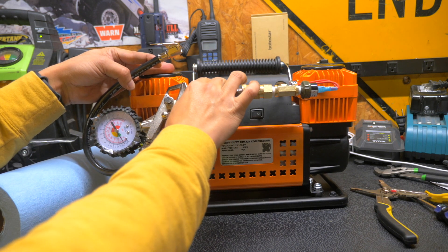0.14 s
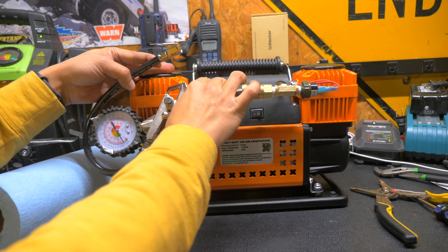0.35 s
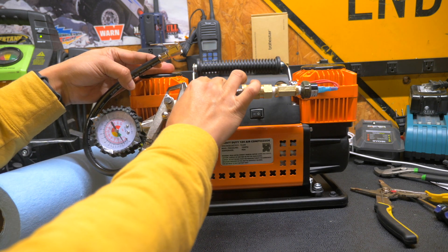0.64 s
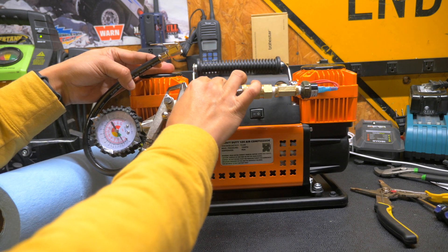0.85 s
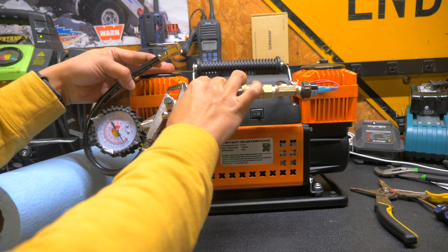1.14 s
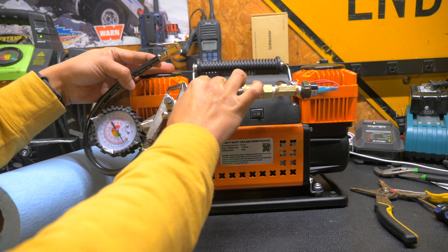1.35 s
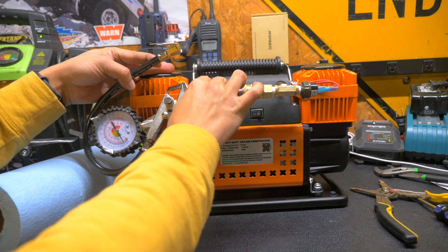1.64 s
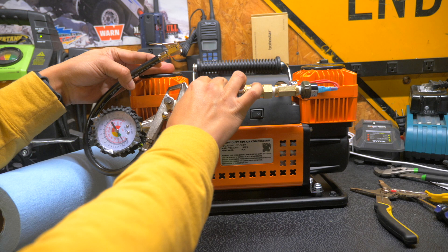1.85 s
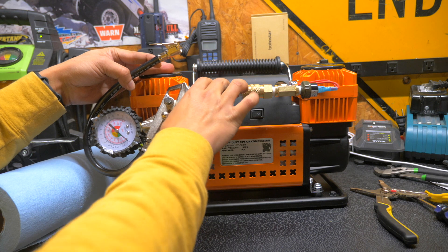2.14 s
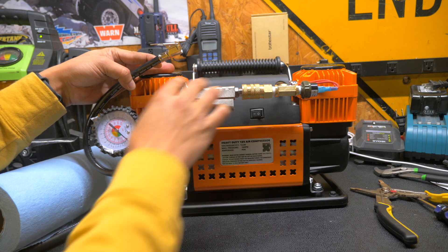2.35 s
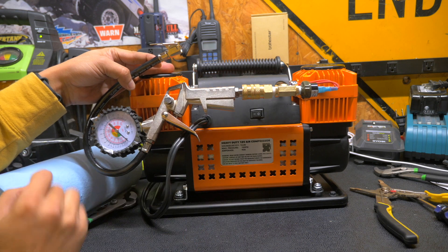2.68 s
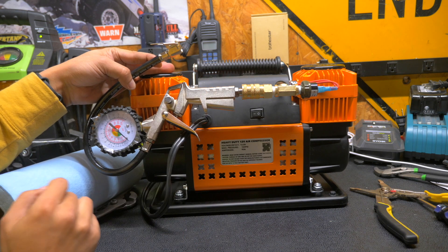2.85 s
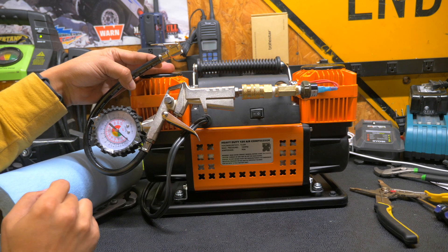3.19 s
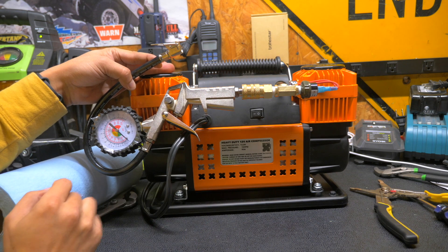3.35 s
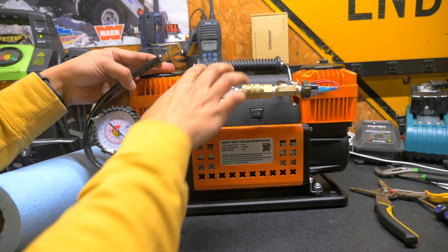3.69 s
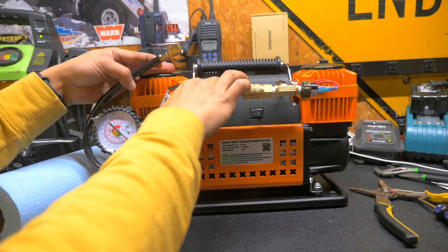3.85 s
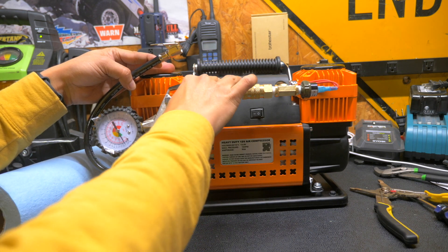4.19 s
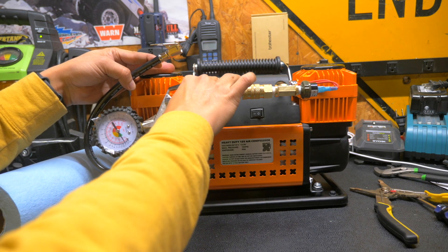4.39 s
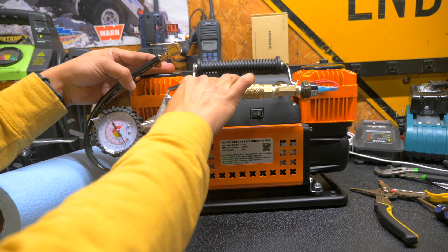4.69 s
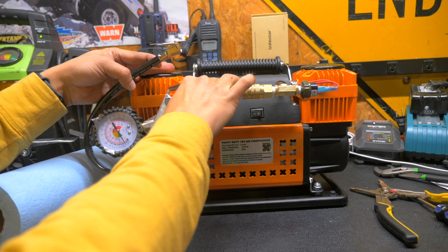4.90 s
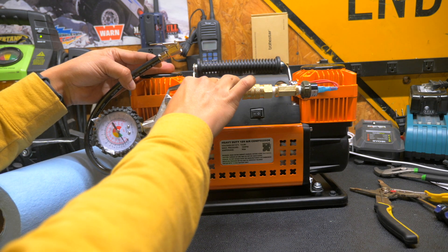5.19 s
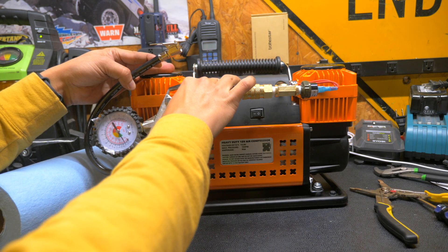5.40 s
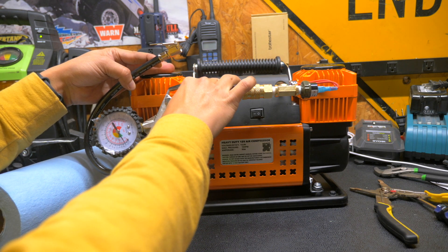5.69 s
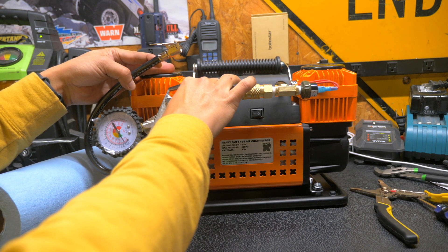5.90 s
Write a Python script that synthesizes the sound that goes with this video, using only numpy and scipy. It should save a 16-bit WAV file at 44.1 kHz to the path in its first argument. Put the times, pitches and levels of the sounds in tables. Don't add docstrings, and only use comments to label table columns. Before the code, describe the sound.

From the start, a small twin-cylinder compressor runs close by on a bench: a coarse, rapid rattling buzz of about 37 strokes a second, with fluttering valves, ringing metal casing, low bench vibration and bright motor whir. A sharp, steady air-gun hiss lies over it. At about 2.1 s the hiss shuts off; the pump sags slightly, then races and climbs in pitch. Around 2.65-2.8 s bright switch clicks cut the power, trapped air bleeds briefly, and the crank slows with a low rumble, stopping near 2.95 s in several dull rocking knocks until 3.1 s. Near silence follows: faint low workshop murmur, a weak fading metallic ring, and tiny handling ticks around 3.4, 3.6 and 3.8 s. At 4.07 s the air gun bursts open, strongest at first; at 4.15 s the motor kicks in, spinning up within a fraction of a second. Buzz and hiss continue together to the end at about 6 s, in a short, dry room.

```python
import sys
import numpy as np
from scipy import signal
from scipy.fft import rfft, irfft
from scipy.io import wavfile
from scipy.ndimage import uniform_filter1d

SR = 44100
rng = np.random.default_rng(int(sys.argv[2]) if len(sys.argv) > 2 else 0)


def unload_wav(signal):
    wavfile.write(
        sys.argv[1],
        SR,
        np.round(np.clip(np.atleast_2d(signal).T, -1, 1) * 32767).astype(np.int16),
    )


def how_loud(loudness_db):
    steps = np.asarray(loudness_db, float) / 20
    return 10 ** steps


N = 266187
T = np.arange(N) / SR

FIRST_ON_S, CUT_S, LAST_STROKE_S, REST_S, RESTART_S = -.28, 2.681, 2.9, 2.95, 4.146
RATED_TURNS_PER_S, SLOW_TURNS_PER_S = 36.8, 25
SPIN_UP_S = .09


def coloured(points):
    hz, db = np.transpose(points)
    bins = np.fft.rfftfreq(N, 1 / SR) + 1
    gain = how_loud(np.interp(np.log(bins), np.log(hz), db, left=-90, right=-90))
    x = irfft(rfft(rng.standard_normal(N)) * gain, N)
    return x / np.std(x)


def walk(rate):
    k = int(SR / rate)
    return uniform_filter1d(np.repeat(rng.standard_normal(N // k + 1), k), k)[:N]


def ring(x, hz, width_hz):
    return signal.lfilter(*signal.iirpeak(hz, hz / width_hz, fs=SR), x)


def add(out, at_s, shape):
    i = int(at_s * SR)
    if 0 <= i < N:
        out[i:i + len(shape)] += shape[:N - i]


def swell(peak_s, db, rise, hold_s, fall):
    return db - rise * np.maximum(peak_s - T, 0) - fall * np.maximum(T - peak_s - hold_s, 0)


def since_on():
    return T - np.where(T < RESTART_S - .002, FIRST_ON_S, RESTART_S)


def ramp(start_s, span_s):
    return np.clip((T - start_s) / span_s, 0, 1.2) * (T < REST_S + .5)


def pump(law, silent=None):
    gun_shut_s = 2.1
    state = [np.ones(N),
             np.minimum(ramp(gun_shut_s, .13), 1),
             np.minimum(ramp(gun_shut_s, .52), 1),
             ramp(CUT_S, .18),
             np.exp(-since_on() / .25),
             np.exp(-since_on() / SPIN_UP_S)]
    value = np.dot(law, state)
    if silent is not None:
        value = np.where((T > LAST_STROKE_S) & (T < RESTART_S - .002), silent, value)
    return uniform_filter1d(value, size=64)


def crank():
    # time in seconds, speed in turns per second.
    racing = [
        (2.09, 36.8),
        (2.21, 35.0),
        (2.35, 36.5),
        (2.5, 42.2),
        (2.646, 46.9),
        (2.69, 46.5),
    ]
    warm = .04 * np.sign(REST_S - T)
    driven = RATED_TURNS_PER_S + warm - 21 * np.exp(-since_on() / SPIN_UP_S)
    speed = np.where(T < racing[0][0], driven, np.interp(T, *np.transpose(racing)))
    coasting = 14 + 32.5 * np.exp(-(T - CUT_S) / .092)
    speed = np.where(T < CUT_S, speed, coasting)
    before, after = np.cumsum(speed) / SR, np.cumsum(driven) / SR
    before = before - np.interp(CUT_S, T, before)
    parked = np.interp(REST_S, T, before)
    resting = np.interp(T, [REST_S, RESTART_S], [parked, np.ceil(parked)])
    after = np.ceil(parked) + after - np.interp(RESTART_S, T, after)
    return np.where(T < REST_S, before, np.where(T < RESTART_S, resting, after))


def reeds(turns, table, level_db, slowest):
    second_law = (0, -3, 2.5, -15.5, -2.5, 0)
    open_law = (0.98, -0.058, -.2, 0.73, 0.13, 0.41)
    pitch_law = (1, -0.032, -0.0072, -0.029, 0, 0)
    slap_law = (0.5, -3.5, -0.5, -12.5, -2.5, -3)
    unrest_law = (1, 8.5, 1.5, 2.5, 5.5, 1)
    second_db, open_share, pitch = pump(second_law), pump(open_law), pump(pitch_law)
    slap_db, unrest_db = pump(slap_law), pump(unrest_law)
    out = np.zeros(N)
    count = np.arange(np.ceil(turns[0]) - 1, turns[-1])
    speed = np.maximum(uniform_filter1d(np.gradient(turns) * SR, size=900), slowest)
    for angle, hz, open_ms, db, octave_db, twelfth_db, glide in table:
        dead_centre = round(2 * angle) / 2
        passing = np.interp(count + dead_centre, turns, T, left=-1, right=-1)
        starts = passing + (angle - dead_centre) / np.interp(passing, T, speed)
        for start, (size, drift) in zip(starts, rng.standard_normal((len(count), 2))):
            i = int(np.clip(start * SR, 0, N - 1))
            length = open_ms / 1000 * np.clip(open_share[i], .3, 2)
            t = (np.arange(int(length * SR)) + i + 1) / SR - start
            unrest = how_loud(unrest_db[i] / 2)
            stroke_hz = hz * pitch[i] * (1 + 0.0028 * unrest * drift)
            phase = 2 * np.pi * stroke_hz * t * (1 + glide * t / length)
            wave = np.cos(phase)
            wave = wave + how_loud(octave_db + slap_db[i]) * np.cos(2 * phase)
            wave = wave + how_loud(twelfth_db + slap_db[i]) * np.cos(3 * phase)
            other_db = second_db[i] * (dead_centre == .5)
            stroke_db = db + level_db[i] + other_db + 0.51 * unrest * size
            add(out, start + 1 / SR, -how_loud(stroke_db) * np.sin(np.pi * t / length) ** 2 * wave)
    return out


def stroke_levels():
    # steady dB, then its change for each state in pump(); the outlet is relative to the intake.
    intake_law = (-0.34, 0.8, 0.65, -3, 2.5, -1)
    outlet_law = (-0.6, -1.5, -0.5, -18, 1.5, -5.5)
    intake_db = pump(intake_law, silent=-100)
    return intake_db, intake_db + pump(outlet_law)


def valves(turns, intake_db, outlet_db):
    # crank angle in turns, flutter in Hz, open time in ms, level in dB, octave in dB, twelfth in dB,
    # glide as a share of the pitch. First intake reeds, then outlet reeds, then air columns.
    intake_reeds = [(0, 556, 10.6, -12.4, -8, -13, -.021), (.473, 471, 11.5, -12.9, -9, -15, .15),
                    (.416, 546, 7.1, -15.4, -12, -20, -.111), (.732, 575, 6.8, -21.2, -5, -45, .004)]
    outlet_reeds = [(.817, 1066, 9.7, -15.6, -26, -45, -.083), (.763, 1843, 4.1, -26.9, -45, -45, -.15),
                    (.902, 1988, 12.2, -38.8, -45, -45, .088), (.483, 1944, 15, -33.9, -45, -45, -.123),
                    (.03, 2180, 12, -46, -45, -45, 0), (.55, 2250, 9, -45, -45, -45, 0),
                    (.6, 1400, 7, -37, -45, -45, 0)]
    air_columns = [(.813, 408, 13.2, -19.8, -9, -18, .128), (.289, 748, 4.6, -20.8, -16, -45, .093)]
    # steady dB, then its change for each state in pump().
    thump_law = (1, 0, 2, -9, -8.5, -3.5)
    # pitch in Hz, width in Hz, level in dB.
    casing = [(520, 63, -13), (1019, 130, -11), (1650, 82, -6), (350, 25, -13.5)]
    out = reeds(turns, intake_reeds, intake_db - 0.58, RATED_TURNS_PER_S)
    out = out + reeds(turns, outlet_reeds, outlet_db, SLOW_TURNS_PER_S)
    out = out + reeds(turns, air_columns, outlet_db + pump(thump_law), SLOW_TURNS_PER_S)
    return out + sum(how_loud(db) * ring(out, hz, width) for hz, width, db in casing)


def pistons(turns):
    # multiple of the turning rate, level in dB.
    multiples = [(1, -31), (2, 2), (3, -16), (4, 1), (5, -11), (6, -3), (7, -10.5), (8, -6), (9, -18)]
    # steady dB, then its change for each state in pump().
    shake_law = (-37.5, -1, 3.5, -23, -0.5, -14.5)
    sway_law = (-74, -6, 32.5, -9.5, 13, -0.5)
    smooth = uniform_filter1d(turns, size=1500)
    shake = sum(how_loud(db) * np.sin(2 * np.pi * k * smooth) for k, db in multiples[1:])
    shake = shake - .8 * ring(shake, 97, 30)
    shake_tone = signal.lfilter(*signal.butter(2, 62, "high", fs=SR), shake) / np.std(shake)
    sway = how_loud(pump(sway_law, silent=-100)) * np.sin(2 * np.pi * smooth)
    return how_loud(pump(shake_law, silent=-100)) * shake_tone + sway


def air_churn(turns, outlet_db):
    # pitch in Hz, level in dB per Hz.
    churn_colour = [(60, -25.5), (250, -19.5), (400, -14.5), (520, -7.5), (750, -4.5), (1050, -1.5),
                    (1300, -5.5), (1500, -10.5), (1650, -11), (1900, -18.5), (2300, -21.5), (3000, -28.5),
                    (4000, -60.5)]
    # steady dB, then its change for each state in pump().
    rise_law = (1, 8, 2.5, 4.5, 2, 0)
    twice_a_turn = 1 + 0.21 * np.cos(4 * np.pi * turns - 1.5)
    return how_loud(outlet_db - 39 + pump(rise_law)) * twice_a_turn * coloured(churn_colour)


def puff(turns):
    return 1 + 1.5 * np.exp(-((turns + .1) % 1) / .05)


def brush_whir(turns):
    # pitch in Hz, level in dB per Hz.
    whir_colour = [(1350, -22), (2300, -9), (2660, -4.5), (3250, -10.5), (3640, -4), (4560, -9.5),
                   (4990, -1.5), (5580, -10), (8630, -1), (9510, -8.5), (10500, -7.5), (12100, -14),
                   (15800, -22.5)]
    whir_law = (-46, -2, 3.5, -0.5, 0, -2)
    powered = (T < CUT_S) | (T > RESTART_S)
    return how_loud(pump(whir_law) + 1.475 * walk(30)) * powered * puff(turns) * coloured(whir_colour)


def labour(turns):
    # crank angle in turns, pitch in Hz, length in ms, level in dB, octave in dB, twelfth in dB,
    # glide as a share of the pitch.
    dead_centres = [(0, 185, 9, -36, -12, -45, 0), (.5, 200, 8, -41, -12, -45, 0)]
    labour_law = (-25, 6, 5.5, 16, 10.5, 13.5)
    return reeds(turns, dead_centres, pump(labour_law, silent=-100), SLOW_TURNS_PER_S)


def air_gun():
    # pitch in Hz, level in dB per Hz.
    jet_colour = [(1530, -46), (2600, -24), (2890, -27), (3570, -23.5), (4940, -12.5), (6240, -14),
                  (7210, -9.5), (7890, -3), (8320, 0.5), (9110, -2), (9890, -2.5), (10400, -5.5),
                  (11800, -9), (14700, -7.5), (15800, -13)]
    roar_colour = [(88, -54.5), (150, -23.5), (623, -12.5), (898, -7.5), (981, -5), (1070, -14.5),
                   (1370, -3), (2820, -17.5), (5000, -8.5), (6500, -30.5), (11000, -120)]
    # opens in seconds, shuts in seconds, jet level in dB, roar minus jet in dB.
    blows = [
        (-.3, 2.115, -23, -20),
        (4.069, 6.2, -23, -19.5),
    ]
    flicker_db = 0.65 * walk(6) + 0.43 * walk(60)
    jet, roar = coloured(jet_colour), coloured(roar_colour)
    out = np.zeros(N)
    for opens, shuts, db, roar_db in blows:
        since = np.maximum(T - opens, 0)
        burst = np.exp(-since / .06)
        jet_db = swell(opens, db, 2600, shuts - opens, 699.5)
        jet_db = jet_db - 0.47 * since + 9.5 * burst
        out = out + how_loud(jet_db + flicker_db) * (jet + how_loud(roar_db - 7.5 * burst) * roar)
    return out


def room(near):
    t = T[:12000]
    tail = rng.standard_normal(len(t)) * how_loud(-60 * t / 0.15) * (t > .004)
    wet = signal.fftconvolve(near, tail / np.sqrt(np.sum(tail ** 2)))[:N]
    return how_loud(-13.5) * wet


def shop_quiet():
    # pitch in Hz, level in dB per Hz.
    shop_colour = [(24, -36), (40, -12.5), (69, -15), (86, -10), (145, -9.5), (173, -12), (401, -23.5),
                   (490, -20), (554, -27.5), (746, -20.5), (933, -29.5), (3070, -41), (15000, -43.5)]
    return how_loud(-64 + 1.2 * walk(9)) * coloured(shop_colour)


def ticks():
    # time in seconds, peak level in dB, pitch in Hz.
    clicks = [(2.655, -31, 11000), (2.68, -36, 9000), (2.70, -37, 9000), (2.725, -39, 7000),
              (2.757, -41, 9000), (2.795, -46, 12000), (2.95, -59, 1800), (2.988, -56, 2000),
              (3.03, -60, 1800), (3.067, -62, 1600), (3.426, -52, 1400), (3.429, -57, 3800),
              (3.62, -62, 1200), (3.66, -63, 1300), (3.8, -62, 1500)]
    out, t = np.zeros(N), T[:4000]
    for s, db, hz in clicks:
        click = ring(ring(rng.standard_normal(len(t)), hz, .9 * hz), hz, .9 * hz)
        add(out, s, how_loud(db + 3 - 60 * t / .03) * click)
    return out


def bleed(turns):
    bleed_swell = (2.66, -45.5, 200, .09, 118)
    # pitch in Hz, level in dB per Hz.
    bleed_colour = [(1470, -32), (2500, -1), (3130, -5.5), (3460, -9.5), (3820, -3.5), (4600, -8.5),
                    (5200, -4.5), (6120, -15), (9000, -4), (10700, -17), (15800, -25)]
    return how_loud(swell(*bleed_swell) + 1.5 * walk(30)) * coloured(bleed_colour) * puff(turns)


def settling():
    # peak time in seconds, peak dB, rise in dB per second, hold in seconds, fall in dB per second.
    rumble_swell = (2.8, -42.5, 500, .08, 125)
    lurch_swell = (2.81, -44, 150, .03, 170)
    # pitch in Hz, level in dB per Hz.
    rumble_colour = [(35, -31), (60, -2.5), (219, -14), (347, -2), (458, -6.5), (835, -3.5), (1210, -17.5),
                     (1520, -15), (5820, -36.5), (8420, -30.5), (15000, -47)]
    # time in seconds, peak level in dB, pitch in Hz, time to fade by 60 dB in seconds.
    knocks = [
        (2.9, -48, 520, .12),
        (2.946, -40, 357, .07),
        (2.985, -42.5, 402, 0.063),
        (3.024, -42, 350, 0.087),
        (3.065, -48, 347, 0.098),
        (3.8, -63, 450, .05),
    ]
    out, t = np.zeros(N), T[:4000]
    for s, db, hz, t60 in knocks:
        rattle = ring(ring(rng.standard_normal(len(t)), 730, 800), 790, 900)
        thud = 0.79 * np.sin(2 * np.pi * hz * t) + 2.7 * rattle
        add(out, s, how_loud(db - 60 * t / t60) * (1 - np.exp(-t / 0.00166)) * thud)
    lurch = how_loud(swell(*lurch_swell)) * np.sin(2 * np.pi * 45 * T)
    rumble = how_loud(swell(*rumble_swell) + 1.5 * walk(28.1)) * coloured(rumble_colour)
    return out + lurch + rumble


def tank_shell():
    level_db = -68 - 60 * (T - 3) / 3.4 + 3.8 * walk(6.8)
    return how_loud(level_db) * (T > REST_S) * (T < 4.1) * np.sin(2 * np.pi * 744 * T)


def scene():
    turns = crank()
    intake_db, outlet_db = stroke_levels()
    compressor = valves(turns, intake_db, outlet_db) + pistons(turns) + air_churn(turns, outlet_db)
    compressor = compressor + brush_whir(turns) + bleed(turns)
    near = compressor + air_gun() + ticks() + settling() + tank_shell()
    return (near + room(near) + shop_quiet() + labour(turns))[None]


def roll_off(x):
    return signal.sosfilt(signal.butter(12, 16380, fs=SR, output="sos"), x)


def record(dry):
    return roll_off(dry)


dry = scene()
out = record(dry)
unload_wav(out)
```